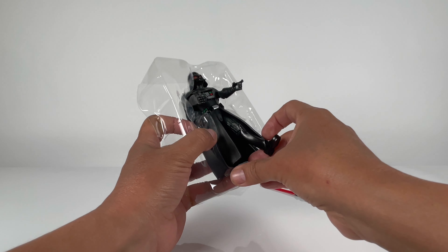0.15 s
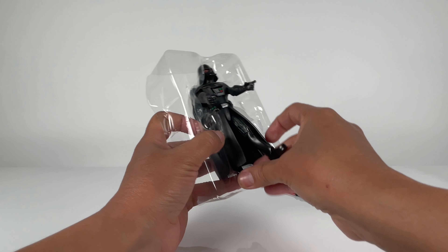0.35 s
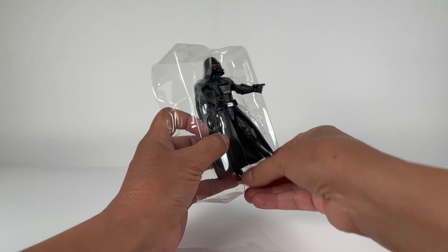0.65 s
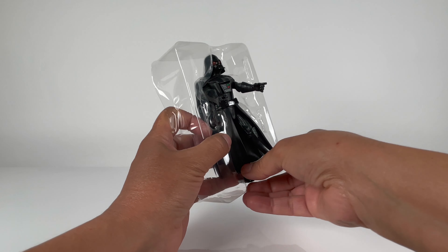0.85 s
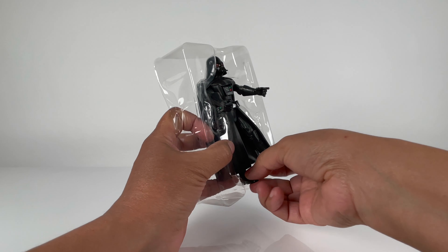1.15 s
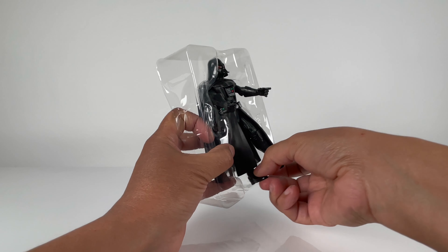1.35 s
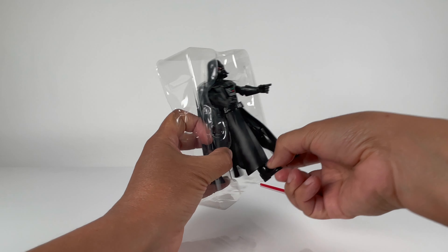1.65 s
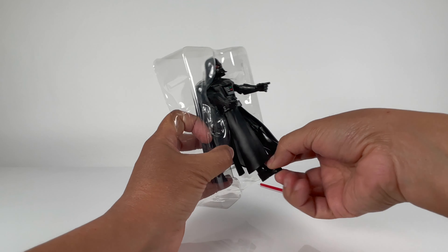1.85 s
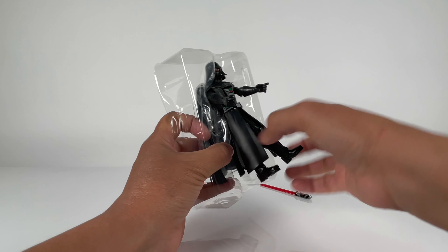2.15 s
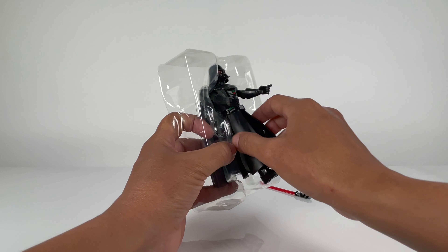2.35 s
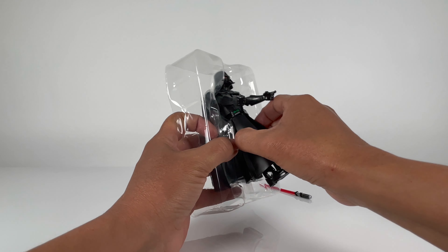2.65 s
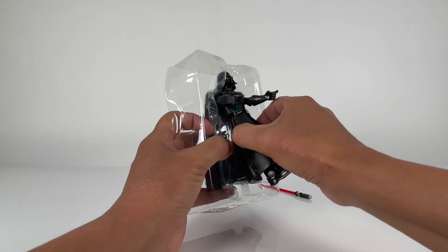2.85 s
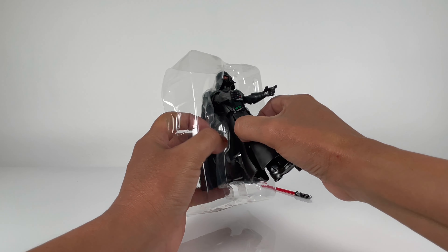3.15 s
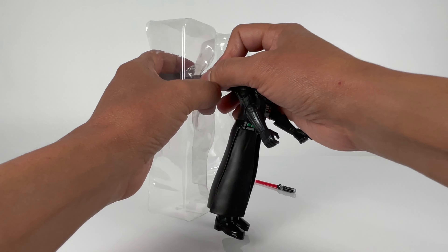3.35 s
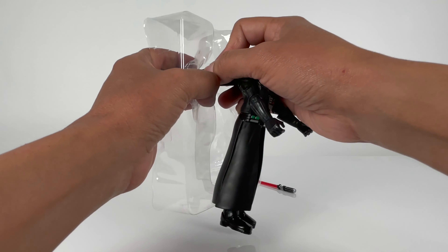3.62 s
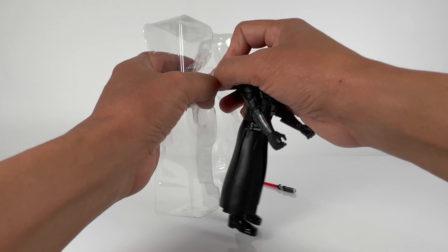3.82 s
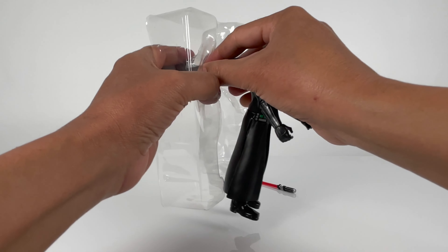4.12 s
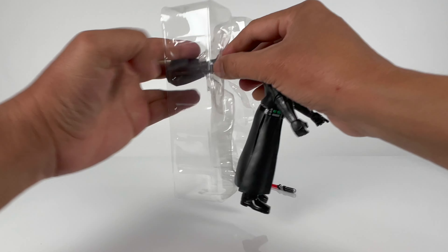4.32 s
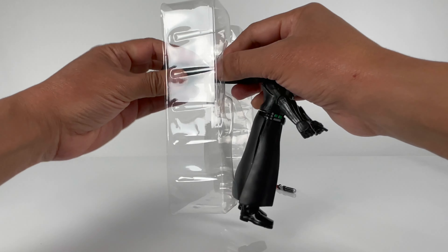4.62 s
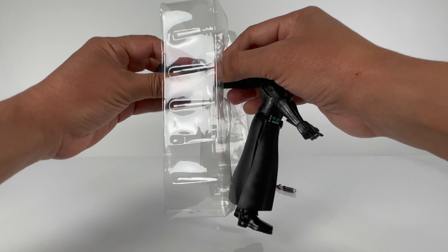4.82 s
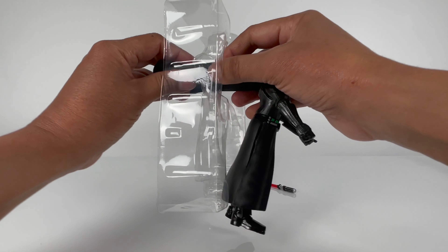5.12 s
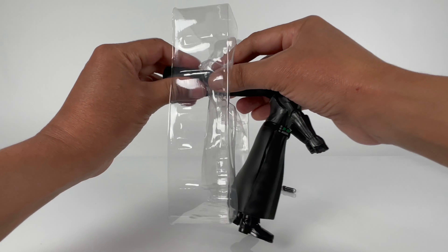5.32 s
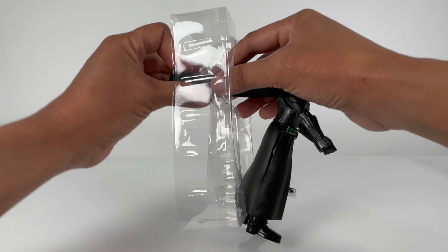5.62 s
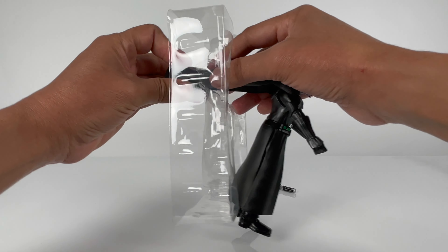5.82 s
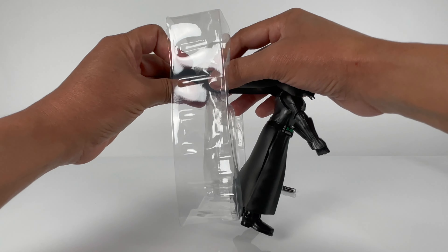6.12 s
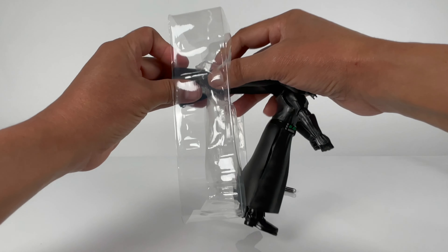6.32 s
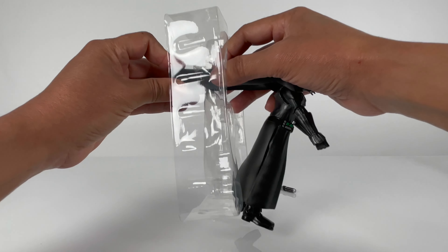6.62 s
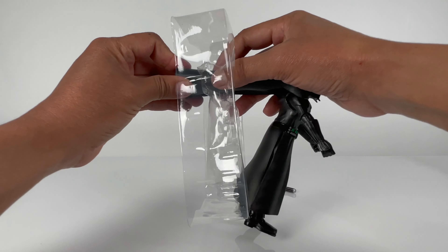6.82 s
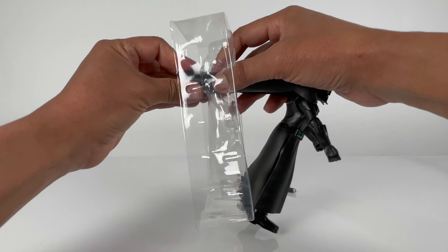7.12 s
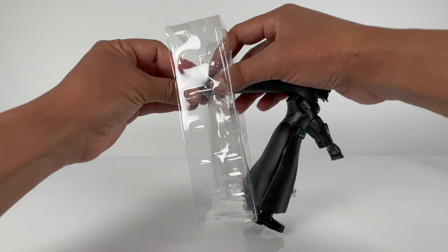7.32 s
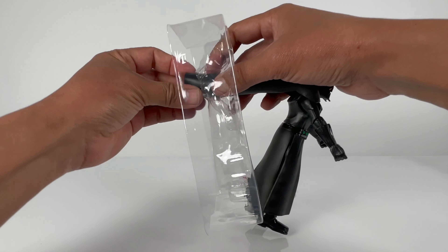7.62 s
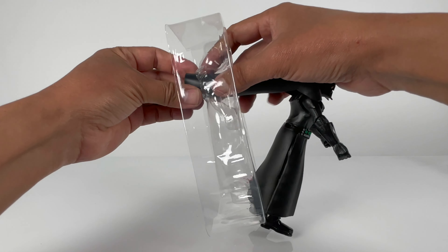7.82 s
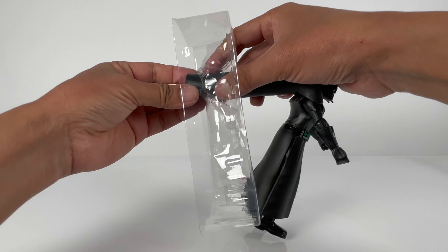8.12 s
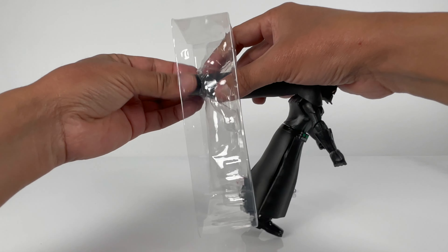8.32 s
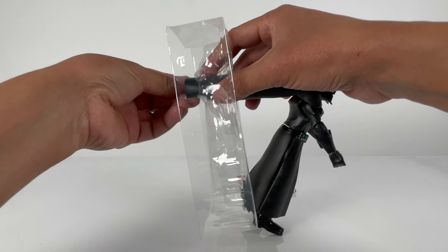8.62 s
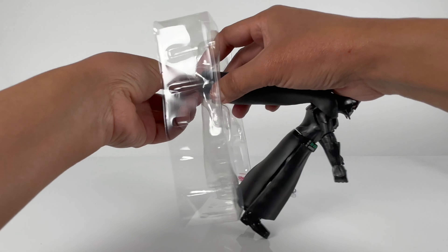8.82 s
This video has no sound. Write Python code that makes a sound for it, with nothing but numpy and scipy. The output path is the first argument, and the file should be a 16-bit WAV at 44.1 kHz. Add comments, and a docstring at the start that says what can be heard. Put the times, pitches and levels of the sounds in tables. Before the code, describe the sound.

Irregular crackling of thin stiff plastic, heard very close in stereo in a small bare room. Hollow pops and muted knocks come first, then a busy flurry, a brief total dropout, and fresh snaps. Later the pops become brighter and more separated, with faint dry scraping and tiny ticks between. A quick squeaky creak leads into a hard snap, and a tight burst of crackles closes over faint air noise.

```python
"""In a small bare room, hands work a toy figure out of a thin plastic blister tray, close to a stereo microphone.
Panels of the tray buckle: each snap is a pulse with decaying noise, rung by two panel modes. Creases crinkle, and
light ticks, crackles and knocks fall on the tray: short noise bursts shaped by broad resonances. Rubbing is a dense
rain of tiny ringing slips; single slips tick on the wall of the tray and once come fast enough to creak. Jolts boom
in its low modes. A room tail and faint air noise surround all this. The sound drops out briefly after three seconds."""
import sys
import numpy as np
from scipy import signal
from scipy.fft import rfft, irfft
from scipy.io import wavfile
from scipy.ndimage import uniform_filter1d

SR = 44100
rng = np.random.default_rng(int(sys.argv[2]) if len(sys.argv) > 2 else 0)


def output_pcm(signal):
    """Save a mono or channel-first signal as 16-bit PCM at the path in sys.argv[1].

    Samples are clipped to [-1, 1] before scaling.
    """
    pcm = np.clip(np.atleast_2d(signal).T, -1, 1) * 32767
    wavfile.write(sys.argv[1], SR, np.round(pcm).astype(np.int16))


N = 395136

# Buckling panels of the tray. Each row: start in seconds, level in dB (before SNAP_DB), main ring in Hz,
# second ring in Hz, lowest radiated frequency in Hz, softness as treble loss in dB per octave.
SNAPS = [(0.027, -32.5, 3420, 4370, 210.0, -1), (0.096, -31, 1340, 910, 370.0, 11.5),
         (0.2926, -38, 2730, 680, 900.0, 5.5), (0.362, -37.0, 1590, 3800, 670.0, 0.5),
         (0.4152, -16, 1360, 827, 520.0, 11), (0.539, -23, 815, 1310, 300.0, 18),
         (0.8174, -20.5, 1790, 800, 720, 14.5), (0.836, -22.5, 915, 1690, 400, 16.5),
         (1.0319, -39.5, 2800, 2120, 790.0, 2), (1.172, -38.5, 1540, 5900, 250.0, -5),
         (1.289, -36, 3600, 1370, 370.0, 5), (1.309, -35, 840, 1530, 210.0, 15.5),
         (1.3489, -26.5, 920, 2250, 120.0, 5), (1.3835, -30, 980, 3900, 390.0, 2.5),
         (1.401, -32, 670, 885, 301.5, 20), (1.4231, -31.5, 980, 2900, 3290.0, 23),
         (1.458, -29.5, 680, 930.0, 750.0, 7), (1.5148, -33.5, 656, 940, 240.0, 12.5),
         (1.5424, -27.5, 3470, 840.0, 230, 6.5), (1.5624, -23.5, 1500, 654, 260.0, 20.5),
         (1.5665, -26, 1770, 970, 495, 13), (1.572, -22.5, 1800, 600, 180.0, 4),
         (1.6391, -15, 1960, 1380, 1070.0, 12.5), (1.642, -15, 1800, 2880, 720.0, 14),
         (1.646, -28.5, 2180, 6000, 898, -2), (1.6957, -29, 1590, 2088, 1640.0, 29),
         (1.713, -32, 915, 1290, 350.0, 10), (1.7595, -25.5, 672, 1560, 250.0, 12),
         (1.853, -17, 1960, 933, 1092, 19), (2.0932, -37, 3760, 4850, 890.0, 0),
         (2.1668, -31, 1260, 938, 120.0, 19.5), (2.4622, -36.5, 790, 1450, 670.0, 21.5),
         (2.5358, -32.5, 2950, 2170.0, 760.0, 5.5), (2.5468, -22, 987, 1670, 330.0, 23.5),
         (2.5876, -17.5, 940, 2170.0, 1130.0, 25.5), (2.5902, -36, 950.0, 1360.0, 480.0, -1.5),
         (2.6112, -29, 660, 960, 150.0, 7.5), (2.7996, -35, 1560, 5100, 760.0, 0),
         (2.8594, -32.5, 1610, 870, 440.0, 3), (2.8986, -29.5, 2000, 5230, 1830.0, 4.5),
         (2.913, -31, 870, 1480, 600.0, 24.5), (2.931, -18, 1565, 6000, 460.0, 1.5),
         (3.0239, -32, 700, 950.0, 880.0, 33.5), (3.0765, -35.5, 980, 585, 210.0, 27),
         (3.5752, -21.5, 1520, 2000, 1100, 7), (3.5785, -26.5, 1580, 520, 248, 13),
         (3.7586, -42.5, 1350, 1770, 440.0, 0), (3.762, -30, 750, 1380, 500, 12),
         (3.821, -23, 1400, 2310, 1090.0, 11.5), (3.9432, -17.5, 1310, 2550, 450, 12),
         (3.9436, -20.5, 1570, 716, 600, 15.5), (4.0373, -25, 4420, 6400, 3290.0, 5),
         (4.0822, -35, 1630, 2330, 280, 11), (4.182, -23, 810, 1160, 740.0, 21.5),
         (4.2045, -15, 1730, 3040, 2400, 14.5), (4.2066, -21.5, 1490, 3800, 1700, 13),
         (4.89, -30.5, 1742, 930.0, 3290.0, 19), (5.1774, -31.5, 1870, 5750.0, 650.0, 4),
         (5.2011, -26.5, 834, 1630, 180.0, 9.5), (5.2329, -34.5, 830, 1530.0, 330.0, 16),
         (5.26, -17.5, 2240, 3540, 690, 7.5), (5.3022, -34, 4430, 1590.0, 3290.0, 10),
         (5.6215, -29.5, 1340, 2220, 1710.0, 16), (5.93, -38, 855, 630, 160.0, 20.5),
         (6.0593, -23.5, 5700, 2600, 900, -3), (6.0893, -25, 2280, 2650, 1100, 6.5),
         (6.126, -19, 4340, 2700, 1205, 1.5), (6.2001, -31.5, 2240, 3420, 1160.0, 15),
         (6.2557, -30, 6450, 1940, 3290.0, 9.5), (6.7715, -22, 2250, 3660, 1502, 6),
         (6.8562, -35, 754, 1120.0, 290.0, 22), (7.039, -38, 800, 2380, 320.0, 9.5),
         (7.151, -39, 3820, 1810.0, 3290.0, 6), (7.2176, -38, 6200, 3060.0, 200.0, -2),
         (7.4043, -37.5, 3500, 1160.0, 450.0, 3.5), (7.4475, -30, 900, 2270, 880.0, 7.5),
         (7.711, -22.5, 4280, 2570, 430.0, 3), (7.741, -29.5, 2340, 1400, 380.0, 6),
         (7.8704, -14.5, 2410, 3800, 700, 3.5), (7.8739, -18, 4180, 1810, 400, 0),
         (8.5845, -39, 1650, 2270, 580.0, 9), (8.694, -38, 3050, 1830.0, 190.0, 6.5),
         (8.7392, -28.5, 3650, 6600, 1080.0, 4.5), (8.764, -29, 3500, 6000, 900, 8),
         (8.7676, -16.5, 1510, 2290, 1204, 2), (8.776, -20, 1770, 805, 700, 7.5),
         (8.818, -18, 1620, 3430, 900, 10), (8.831, -25, 800, 1830.0, 450, 16),
         (8.849, -28, 920, 1500, 500, 15), (8.9091, -27.5, 1400, 2320, 1960.0, 12)]
# Radiation of the tray. Each row: frequency in Hz, level in dB.
TRAY_COLOUR = [(40, -30), (95, -13.5), (150, -4), (255, 6), (380, -1), (650, 2.5), (6600, 2), (8100, -6.5),
               (11000, -0.5), (12800, -6.5), (14200, -17.5)]
# Strokes of the toy and fingers along the tray. Each row: start in seconds, length in seconds, level in dB.
STROKES = [(0.26, 0.063, -42.5), (0.785, 0.1, -48.5), (0.993, 0.153, -53), (1.331, 0.1, -42),
           (1.51, 0.24, -51), (2.153, 0.1, -50.5), (2.295, 0.023, -44.5), (2.563, 0.07, -42.5),
           (2.67, 0.1, -50), (2.892, 0.085, -39), (2.962, 0.26, -59.5), (3.51, 0.58, -55),
           (3.885, 0.338, -47.5), (4.598, 0.041, -50.5), (4.71, 0.039, -57.5), (4.849, 0.12, -52.5),
           (5.201, 0.098, -36), (5.386, 0.27, -47.5), (5.912, 0.33, -47.5), (6.274, 0.21, -58.5),
           (6.584, 0.051, -58), (6.682, 0.23, -45), (6.765, 0.25, -44), (7.027, 0.13, -47.5),
           (7.247, 0.075, -47.5), (7.418, 0.14, -37.5), (7.657, 0.22, -47.5), (7.836, 0.3, -46),
           (8.196, 0.029, -49), (8.513, 0.18, -54.5), (8.659, 0.2, -38.5), (8.878, 0.09, -46)]
# Colour of the rubbing. Each row: frequency in Hz, level in dB.
RUB_COLOUR = [(40, -17.5), (150, -7), (270, 2), (400, -3.5), (850, -2.5), (2400, -10.5), (6500, -16),
              (8500, -34.5), (12000, -25.5), (16000, -45)]
# Stick-slip creak, read as curves. Each row: time in seconds, slips per second, level in dB (before the creak's
# gain), unevenness from 0 to 1, ring of the pinched spot in Hz, lowest frequency the wall radiates in Hz.
CREAK = [(7.424, 88, -40.5, 0.69, 2256, 292), (7.45, 110, -33, 0.76, 2320, 352),
         (7.491, 125, -30.5, 0.58, 2320, 400), (7.535, 240, -29.5, 0.27, 2520, 495),
         (7.563, 220, -31.5, .14, 2580, 850), (7.601, 145, -30.5, 0.1, 2474, 1280),
         (7.634, 95, -32, 0.16, 2460, 1577)]
# Resonances of the wall of the tray, before stiffening. Each row: frequency in Hz, width in Hz, level in dB.
WALL_MODES = [(278, 42, 7), (644, 37, 9), (945, 75, 13.5), (1220, 24, 12), (1738, 47, 14), (2260, 85, 12),
              (3990, 650, -4), (6200, 320, -15)]
# Single slips of the toy that tick on the wall. Each row: start in seconds, level in dB (before their gain).
SLIPS = [(1.016, -44), (1.076, -53), (1.094, -54), (1.108, -53), (1.126, -61), (1.156, -49), (5.411, -45.5),
         (5.435, -45.5), (5.451, -55), (5.514, -43), (5.525, -60), (5.546, -57), (5.561, -49), (5.586, -48),
         (5.605, -51.5), (5.744, -50), (5.765, -45.5), (5.934, -40.5), (6.693, -48), (6.719, -56),
         (6.893, -54), (6.932, -41.5), (7.01, -53), (7.06, -42), (7.078, -55), (7.095, -47), (7.123, -41),
         (7.207, -42.5), (7.277, -47), (7.295, -44.5), (7.36, -47), (7.641, -35.5), (7.666, -32.5),
         (7.69, -40.5), (7.755, -36), (7.765, -36.5), (7.782, -34.5), (7.8, -40.5), (7.819, -42.5),
         (8.019, -43.5), (8.037, -44), (8.06, -52), (8.105, -58), (8.145, -46.5), (8.315, -52),
         (8.372, -48.5), (8.507, -48)]
# Runs of popping creases. Each row: start in seconds, length in seconds, typical tick level in dB,
# typical pitch in Hz.
CRINKLES = [(0.0, .21, -57.5, 6850), (1.034, .1, -57.5, 1890), (1.337, .13, -46, 1820),
            (1.559, .18, -44.5, 2000), (2.237, .14, -70, 6500), (2.58, .05, -43, 3020),
            (4.215, .09, -51.5, 2900), (5.419, .3, -65, 3000), (6.298, .3, -68, 4000),
            (6.799, .17, -48.5, 1570), (7.421, .09, -47.5, 3500), (8.755, .1, -41, 2000)]
# Light ticks, crackles and knocks on the tray. Each row: start in seconds, level in dB, centre in Hz.
TAPS = [(0.02, -36.5, 1560), (0.149, -56, 6800), (0.55, -45.5, 10500), (0.631, -38, 1060),
        (0.687, -42, 1400), (0.998, -42, 5000), (1.138, -51, 6500), (1.236, -58, 9000), (1.323, -42, 1200),
        (1.336, -39, 1700), (1.413, -29, 880), (1.435, -36, 700), (1.447, -36, 695), (1.584, -35, 950),
        (1.592, -31, 1091), (1.614, -29.5, 1010), (1.754, -46, 1310), (1.792, -35.5, 1800),
        (2.191, -60, 11600), (2.309, -48.5, 1150), (2.326, -50.5, 8450), (2.504, -43, 4450),
        (2.708, -37.5, 1500), (2.734, -41, 1360), (2.76, -47.5, 8000), (2.772, -42.5, 1370),
        (2.821, -36.5, 1200), (2.894, -28, 920), (2.975, -38, 1280), (3.203, -45.5, 1110),
        (3.273, -45.5, 1004), (4.141, -45, 1170), (4.456, -47, 1410), (4.54, -51, 970), (4.64, -60.5, 2650),
        (4.742, -51.5, 1100), (4.803, -58, 1170), (5.492, -38.5, 1250), (5.905, -42, 1500),
        (6.144, -34, 4200), (6.337, -44, 1280), (6.482, -47.5, 686), (6.956, -37, 2000),
        (8.211, -51.5, 886), (8.392, -42, 900)]
# Jolts of the whole tray in the hand. Each row: start in seconds, level in dB before the envelope, mode in Hz.
JOLTS = [(1.399, -36, 243.3), (1.44, -41.5, 247), (1.566, -47, 120.5), (1.631, -54.5, 111),
         (1.853, -41.5, 261), (2.172, -35, 233), (2.543, -50, 99), (2.551, -41.5, 240), (2.97, -59, 98.7),
         (3.576, -33.5, 248), (4.03, -30, 330), (4.222, -52.5, 135), (5.203, -42, 235), (5.279, -52, 130),
         (7.873, -42, 204), (8.818, -44.5, 124)]
# Reverberation of the room. Each row: frequency in Hz, relative level in dB, decay by 60 dB in seconds.
ROOM = [(100, -6, 0.49), (258, -2, 0.32), (910, -5, 0.19), (2380, -5, 0.3), (5000, -4, 0.31),
        (9800, -3.5, 0.25), (15000, -21.5, 0.5)]
# Colour of the still air. Each row: frequency in Hz, relative level in dB.
AIR_COLOUR = [(25, -1.5), (100, -4.5), (260, -4.5), (1000, -7), (16000, -40.5)]
# Difference of the two ports. Each row: frequency in Hz, left minus right in dB, lead of the left in radians.
PORTS = [(220, -3, 0.055), (357, -0.5, 1.92), (650, 2.5, 0.97), (1120, 2.5, 1.61), (2060, -1.5, 1.04),
         (4500, 3, 2.03), (13000, 0.5, 1)]
# Dropout of the sound: start in seconds, end in seconds.
SILENCE = (3.32, 3.485)

HIT_SIZE = 4096  # samples in one short sound
SNAP_DB = 1  # gain of all snaps
SOFT_ABOVE_HZ = 1630  # a soft flip loses its treble above this pitch
SLOWER_PER_DB = 18  # softness in dB per octave at which a flip's build-up takes twice as long
SETTLE_DB, SETTLE_S = -23.5, 0.031  # the sheet settles on the toy: level relative to the snap, time constant
STROKE_ATTACK_S, STROKE_RELEASE_S = 0.0087, 0.021  # time constants of a stroke
GRIP_DB = -75  # the resting grip still stirs the sheet
TOP_HZ = 16600  # upper edge of the final low-pass


def undb(db):
    """Decibels to amplitude gain."""
    return 10 ** (np.asarray(db) / 20)


def unit(x):
    """Scaling to rms 1."""
    return x / np.sqrt(np.mean(x ** 2) + 1e-18)


def at_level(sound, level_db):
    """Short-event level: the energy of the event counts as if spread over a hundredth of a second."""
    return undb(level_db) * unit(sound) * np.sqrt(SR / 100 / HIT_SIZE)


def place(out, start_s, sound):
    """Superposition: add a sound at its moment."""
    i = int(start_s * SR)
    out[..., i:i + sound.shape[-1]] += sound


def bins(size):
    """Frequencies of a spectrum in Hz, kept above zero."""
    return np.maximum(np.fft.rfftfreq(size, 1 / SR), 1)


def on_log_axis(f, hz, values):
    """Linear interpolation over log frequency."""
    return np.interp(np.log(f), np.log(hz), values)


def causal(db):
    """Minimum phase: the folded cepstrum of a dB curve gives a response with nothing before the hit."""
    cepstrum = irfft(np.log(undb(db)))
    half = len(cepstrum) // 2
    cepstrum[1:half] *= 2
    cepstrum[half + 1:] = 0
    return np.exp(rfft(cepstrum))


def colour(x, points):
    """Spectral shaping by a minimum-phase filter through (Hz, dB) points."""
    curve_db = on_log_axis(bins(HIT_SIZE), *np.transpose(points))
    response = irfft(causal(curve_db))
    return signal.fftconvolve(x, response[None], axes=1)[:, :N]


def two_ports(size, apart_hz):
    """Coherence: noise at two ports is shared in the bass and parts above apart_hz."""
    mid, side = rng.standard_normal((2, size))
    side = 0.72 * irfft(rfft(side) / (1 + apart_hz / bins(size)), size)
    return unit(mid + side * np.array([[1], [-1]]))


def bending(f, spread_s):
    """Dispersion: bending waves in a sheet carry highs first; spread_s is the delay at 1 kHz."""
    return np.exp(-4j * np.pi * spread_s * np.sqrt(1000 * f))


def snaps():
    """Snap-through buckling: each panel flips at its moment; returns left, right, into the room."""
    out = np.zeros((3, N + HIT_SIZE))
    for start_s, *settings in SNAPS:
        place(out, start_s, snap(*settings))
    return out[:, :N]


def snap(level_db, ring_hz, second_hz, low_hz, softness_db, crack_s=0.0012, crack_db=9,
         flutter_s=0.0092, flutter_db=1.5, rise_s=0.00076, ring_db=12, second_db=8,
         ring_width_hz=60, damped_hz=6000, dull_hz=5000, facing=0.71, ripple=0.56):
    """Impulsive excitation: a pulse, its crease echoes as decaying noise, and a flutter ring two panel modes."""
    f, t = bins(HIT_SIZE), np.arange(HIT_SIZE) / SR
    slow = 1 + max(softness_db, 0) / SLOWER_PER_DB
    rise = 1 - np.exp(-t / (slow * rise_s))

    def burst(decay_s):
        """Decaying noise: a fresh random burst under an exponential envelope."""
        noise = two_ports(HIT_SIZE, apart_hz=925) * rise * np.exp(-t / decay_s)
        return rfft(noise) * np.sqrt(2 / decay_s / SR)

    crack = burst(slow * crack_s)
    flutter = burst(flutter_s) / (1 + 1j * f / dull_hz)
    pulse = bending(f, spread_s=0.0005156)
    flip = pulse + undb(crack_db) * crack + undb(flutter_db) * flutter
    modes_db = 0
    for hz, db in ((ring_hz, ring_db), (second_hz, second_db)):
        # high modes are damped much more strongly
        width = ring_width_hz * (1 + (3 * hz / damped_hz) ** 2)
        modes_db = modes_db + 10 * np.log10(1 + undb(db) ** 2 / (1 + (2 * (f - hz) / width) ** 2))
    tray_db = on_log_axis(f, *np.transpose(TRAY_COLOUR))
    direct = panel(flip, tray_db + modes_db, level_db, low_hz, softness_db)
    # summed over all directions, the peaks of a single panel stand out less
    all_round = panel(pulse + ripple * crack[:1], tray_db + facing * modes_db, level_db, low_hz, softness_db)
    return np.vstack([direct, all_round])


def panel(source, shape_db, level_db, low_hz, softness_db, steepness=4):
    """Radiation efficiency: a small panel radiates little bass, and a soft flip little treble."""
    f = bins(HIT_SIZE)
    bass_loss_db = 10 * np.log10(1 + (low_hz / f) ** steepness)
    treble_loss_db = softness_db * np.log2(np.hypot(1, f / SOFT_ABOVE_HZ))
    shape_db = shape_db - bass_loss_db - treble_loss_db
    dying = np.minimum(2 - 2 * np.arange(HIT_SIZE) / HIT_SIZE, 1) ** 2
    sound = irfft(source * causal(np.maximum(shape_db, shape_db.max() - 90))) * dying
    return at_level(sound, SNAP_DB + level_db)


def rubbing(slips_per_s=280, scatter_db=4, ring_s=0.004, low_hz=350, high_hz=3500, focus=0.55,
            hiss_db=-16, dull_hz=3000, firm_db=-40, gain_db=0, count=10):
    """Sliding friction: tiny slips at several contact points, each ringing at its pitch, over a smooth slide."""
    f, t = bins(HIT_SIZE), np.arange(HIT_SIZE) / SR
    contacts = 0
    for hz in np.geomspace(low_hz, high_hz, count):
        size = undb(scatter_db * np.minimum(rng.exponential(size=N), 3))
        hits = (rng.random(N) < slips_per_s / count / SR) * size
        burst = rfft(two_ports(HIT_SIZE, apart_hz=900) * np.exp(-t / ring_s))
        ring = irfft(burst / (1 + 1j * focus * (f / hz - hz / f)))
        contacts = contacts + signal.fftconvolve(hits[None], ring, axes=1)[:, :N]
    slide = undb(hiss_db) * two_ports(N, apart_hz=900)
    sound = unit(colour(unit(contacts) + slide, RUB_COLOUR))
    level_db = sliding_db() + catching()
    # a light touch slides dully; the treble comes with pressure
    dull = signal.sosfilt(signal.butter(2, dull_hz, fs=SR, output="sos"), sound)
    pressure = np.minimum(undb(level_db - firm_db), 1)
    return (dull + pressure * (sound - dull)) * undb(gain_db + level_db)


def sliding_db():
    """Addition of powers: the strokes, the settling after each snap and the resting grip set the rubbing level."""
    t = np.arange(SR) / SR
    power = np.full(N + SR, undb(GRIP_DB) ** 2)
    for start_s, length_s, db in STROKES:
        attack = 1 - np.exp(-t / STROKE_ATTACK_S)
        release = np.exp(-np.maximum(t - length_s, 0) / STROKE_RELEASE_S)
        place(power, start_s, (undb(db) * attack * release) ** 2)
    settling = undb(SETTLE_DB) * np.exp(-t / SETTLE_S)
    for start_s, db, *_ in SNAPS:
        place(power, start_s, (undb(db) * settling) ** 2)
    return 10 * np.log10(power[:N])


def catching(catches_per_s=45, depth_db=3.0):
    """Irregular friction: the grip catches and frees itself, as interpolated random levels in dB."""
    steps = rng.standard_normal(4000)
    return depth_db * np.interp(np.arange(N) / SR * catches_per_s, np.arange(len(steps)), steps)


def creak(wander=0.04, jitter=0.2, scatter_db=3.0, grit_db=3, grit_s=0.0019, pinch_db=-3,
          pinch_width_hz=400, dull_hz=5400, gain_db=-1):
    """Stick-slip: slips speed up, fall into step and slow down, each ringing the wall and the pinched spot."""
    out, f, t = np.zeros(N + HIT_SIZE), bins(HIT_SIZE), np.arange(HIT_SIZE) / SR
    times, *controls = np.transpose(CREAK)
    now = times[0]
    for chance in rng.standard_normal((60, HIT_SIZE)):
        if now >= times[-1]:
            break
        per_s, level_db, uneven, pinch_hz, low_hz = (np.interp(now, times, c) for c in controls)
        # uneven slips scrape for a moment, so no two are alike
        scrape = rfft(chance * np.exp(-t / grit_s) * np.sqrt(2 / grit_s / SR))
        push = 1 + undb(grit_db) * uneven * scrape
        pinch = irfft(1 / (1 + 1j * (f - pinch_hz ** 2 / f) / pinch_width_hz) / (1 + 1j * f / dull_hz))
        wall = wall_ring(0.97 + wander * chance[2])
        ring = rfft(unit(wall) + undb(pinch_db) * unit(pinch))
        slip = irfft(push * ring / (1 - 1j * low_hz / f) ** 2 * soft_contact(f, dull_hz))
        # the level holds over one slip period
        gain = undb(level_db + uneven * scatter_db * chance[0]) * np.sqrt(SR / per_s / HIT_SIZE)
        place(out, now, gain * unit(slip))
        now += np.exp(uneven * jitter * chance[1]) / per_s
    return undb(gain_db) * out[:N]


def soft_contact(f, dull_hz):
    """Finite contact time: a slip takes a moment, so its treble falls away steeply."""
    return 1 / (1 - (f / dull_hz) ** 2 + 1j * np.sqrt(2) * f / dull_hz) ** 2


def wall_ring(stiffening, soft_hz=4200):
    """Modal sum: one slip rings all resonances of the wall; a taut wall rings higher."""
    f = bins(HIT_SIZE)
    wall = sum(undb(db) / (1 + 1j * (f - (stiffening * hz) ** 2 / f) / width) for hz, width, db in WALL_MODES)
    ring = irfft(wall * bending(f, spread_s=0.001995) / (1 + 1j * f / soft_hz) ** 2)
    return ring / np.linalg.norm(ring)


def slips(scrape_s=0.0011, scrape_db=-1, wander=0.02, contact_hz=1900, contact_db=1, low_hz=600,
          dull_hz=4400, gain_db=0.5):
    """Single release of friction: a pulse and brief scrape drive the contact and a wall ring that varies in pitch."""
    out, f, t = np.zeros((2, N + HIT_SIZE)), bins(HIT_SIZE), np.arange(HIT_SIZE) / SR
    contact = unit(irfft(1 / (1 + 1j * (f / contact_hz - contact_hz / f)) / (1 + 1j * f / contact_hz / 2)))
    for start_s, db in SLIPS:
        scrape = two_ports(HIT_SIZE, apart_hz=880) * np.exp(-t / scrape_s) * np.sqrt(2 / scrape_s / SR)
        push = 1 + undb(scrape_db) * rfft(scrape)
        ring = unit(wall_ring(1 + wander * rng.standard_normal())) + undb(contact_db) * contact
        tick = irfft(push * rfft(ring) / (1 - 1j * low_hz / f) * soft_contact(f, dull_hz))
        place(out, start_s, at_level(tick, db))
    return undb(gain_db) * out[:, :N]


def crinkles(ticks_per_s=95, scatter_db=4, scatter_octaves=0.59, ring_s=0.0012, gain_db=0):
    """Crackling: small creases pop one after another, each at its own moment, strength and pitch."""
    out = np.zeros((2, N + HIT_SIZE))
    for start_s, length_s, db, hz in CRINKLES:
        for slot in np.arange(start_s, start_s + length_s, 1 / ticks_per_s):
            strength, pitch = np.clip(rng.standard_normal(2), -2, 2)
            moment = slot + rng.random() / ticks_per_s
            tick_hz = hz * 2 ** (scatter_octaves * pitch)
            place(out, moment, knock(gain_db + db + scatter_db * strength, tick_hz, ring_s))
    return out[:, :N]


def taps(ring_s=0.0052, gain_db=0):
    """Brief excitation: light ticks, crackles and knocks on the tray."""
    out = np.zeros((2, N + HIT_SIZE))
    for start_s, db, hz in TAPS:
        place(out, start_s, knock(gain_db + db, hz, ring_s))
    return out[:, :N]


def knock(level_db, hz, ring_s, damped_hz=5000, spread=0.66, contact_ratio=1.6):
    """Modal density: a light hit excites a broad hump of modes; harder contact sits higher and dies sooner."""
    f, t = bins(HIT_SIZE), np.arange(HIT_SIZE) / SR
    hump = 1 / (1 + 1j * spread * (f / hz - hz / f)) ** 2 / (1 + 1j * f / (contact_ratio * hz)) ** 2
    burst = two_ports(HIT_SIZE, apart_hz=900) * np.exp(-t / ring_s * (1 + hz / damped_hz))
    return at_level(irfft(rfft(burst) * hump), level_db)


def jolts(width=0.21, swell_cycles=0.21, fade_cycles=4.4, gain_db=0):
    """Damped resonance: a low mode of the tray, damped by the fingers, swells and dies within a few cycles."""
    out, f, t = np.zeros((2, N + SR)), bins(SR), np.arange(SR) / SR
    for start_s, db, hz in JOLTS:
        mode = 1 / (1 + 1j * (f / hz - hz / f) / (2 * width)) ** 2
        boom = unit(irfft(rfft(two_ports(SR, apart_hz=900)) * mode))
        envelope = (1 - np.exp(-t * hz / swell_cycles)) * np.exp(-t * hz / fade_cycles)
        place(out, start_s, undb(db) * boom * envelope)
    return undb(gain_db) * out[:, :N]


def varied_room(x, step_s=.09, count=4):
    """Averaging over random responses: the sound fades round several random room tails, so none dominates."""
    position = np.arange(N) / SR / step_s
    distance = (abs((position - k) % count - count / 2) for k in range(count))
    return sum(room(x * np.sqrt(np.maximum(1 - d, 0))) for d in distance)


def room(x, first_s=0.0032, build_s=0.00053):
    """Reverberation: bare walls return a dense noise tail with its own exponential decay in each band."""
    size = SR * 3 // 5
    f, t = bins(size), np.arange(size) / SR
    hz = [row[0] for row in ROOM]
    noise, tail = rfft(two_ports(size, apart_hz=402)), 0
    onset = 1 - np.exp(-np.maximum(t - first_s, 0) / build_s)
    # each band is a triangle over log frequency
    for share, (_, db, t60) in zip(np.eye(len(ROOM)), ROOM):
        fade = onset * np.exp(-np.log(1000) * t / t60)
        band = irfft(noise * on_log_axis(f, hz, share), size)
        tail = tail + undb(db) * band * fade / np.linalg.norm(fade)
    return signal.fftconvolve(x[None], tail, axes=1)[:, :N]


def still_air(air_db=-78):
    """Background noise: steady, faint and coloured, shared by the ports in the bass."""
    return undb(air_db) * unit(colour(two_ports(N, apart_hz=300), AIR_COLOUR))


def ports(sound):
    """Level and phase differences: the two ports differ in both across frequency."""
    hz, left_db, lead = np.transpose(PORTS)
    f = bins(N)
    half = undb(on_log_axis(f, hz, left_db) / 2) * np.exp(.5j * on_log_axis(f, hz, lead))
    return irfft(rfft(sound) * np.array([half, 1 / half]), N)


def scene(snap_room_db=-4.5, tick_room_db=-1.5):
    """Superposition: direct sounds, their room and still air reach the two ports."""
    buckles = snaps()
    contact = taps() + jolts() + rubbing() + creak()
    ticks = slips() + crinkles()
    into_room = undb(snap_room_db) * buckles[2] + (contact + undb(tick_room_db) * ticks).mean(axis=0)
    return ports(buckles[:2] + contact + ticks + varied_room(into_room) + still_air())


def record(dry):
    """Saturation and band limit: the loudest peaks are rounded, a silence interrupts, the top is cut."""
    t = np.arange(N) / SR
    outside = ((t < SILENCE[0]) | (t > SILENCE[1])).astype(float)
    running = uniform_filter1d(outside, size=400)  # edges fade over 400 samples
    rounded = dry / (1 + (dry / .85) ** 4) ** .25
    return signal.sosfilt(signal.ellip(8, .2, 70, TOP_HZ, fs=SR, output="sos"), rounded * running)


dry = scene()
out = record(dry)
output_pcm(out)
```